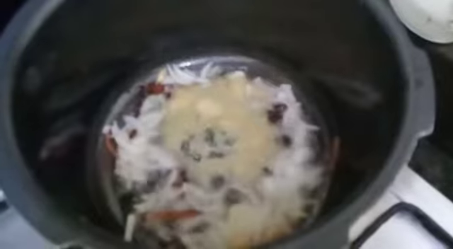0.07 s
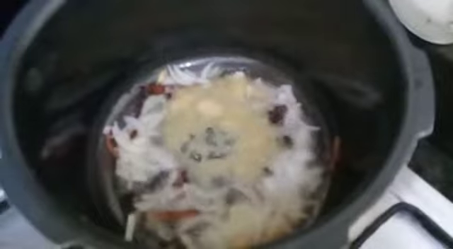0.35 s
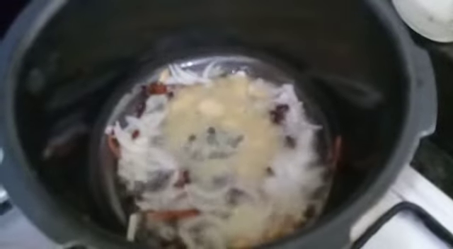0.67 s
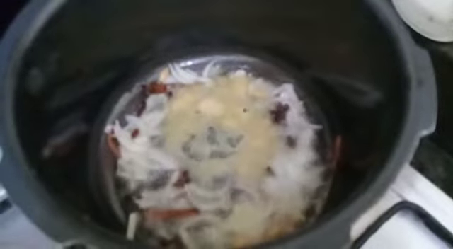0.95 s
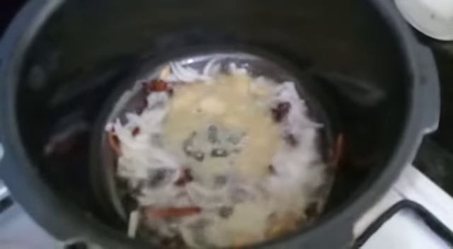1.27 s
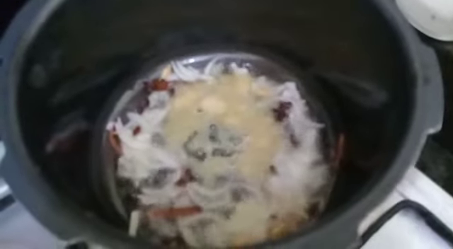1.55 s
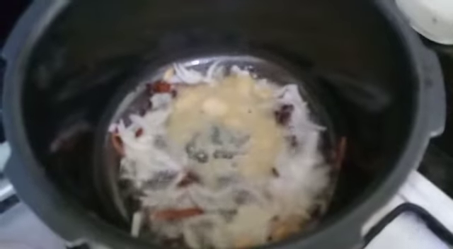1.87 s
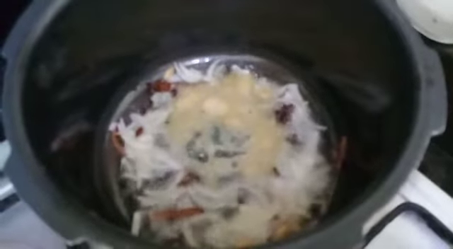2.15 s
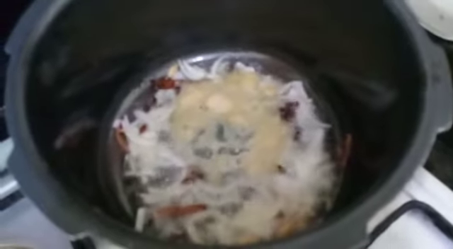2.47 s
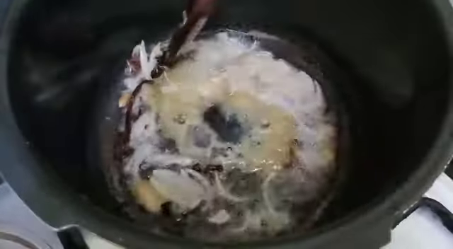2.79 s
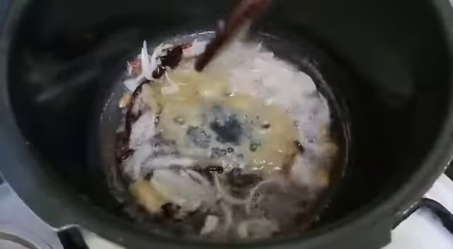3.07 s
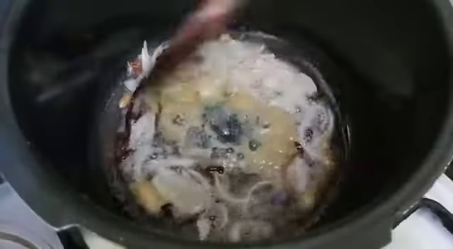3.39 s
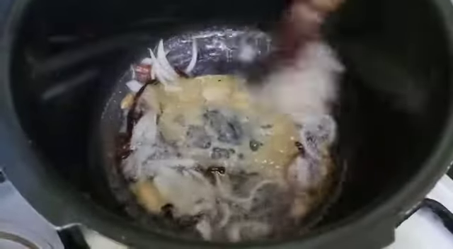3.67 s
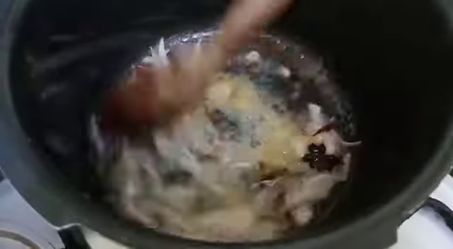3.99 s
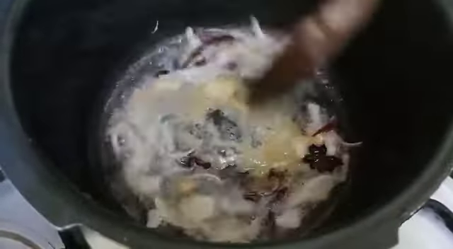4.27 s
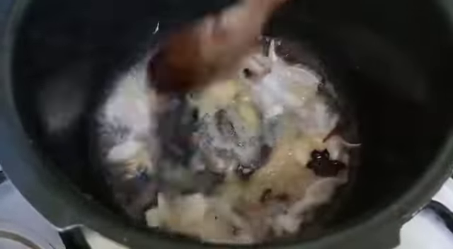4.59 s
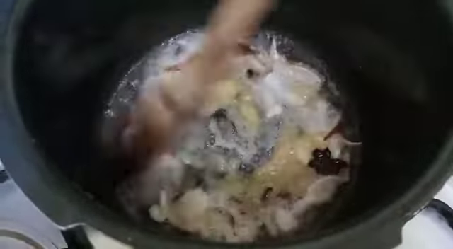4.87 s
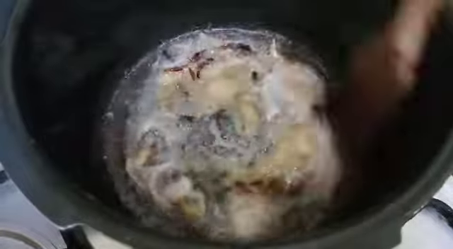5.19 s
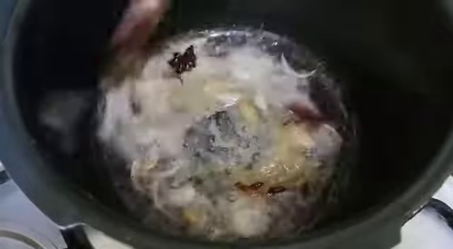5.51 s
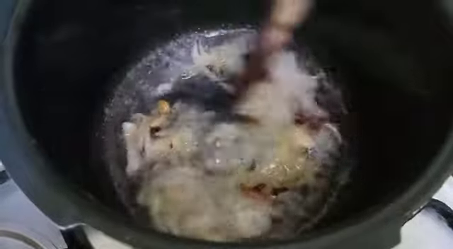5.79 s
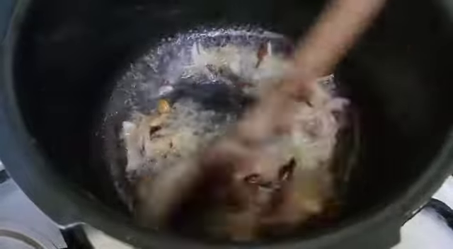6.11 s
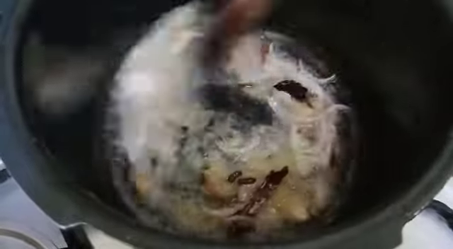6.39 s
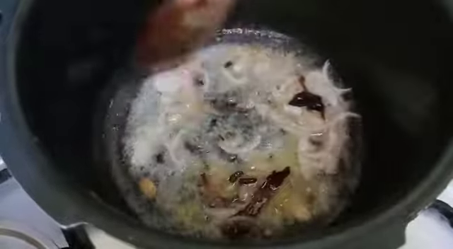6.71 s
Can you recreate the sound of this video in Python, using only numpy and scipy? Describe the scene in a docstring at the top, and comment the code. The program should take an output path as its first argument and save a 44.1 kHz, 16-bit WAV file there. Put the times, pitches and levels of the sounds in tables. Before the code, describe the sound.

Onions and spices crackle in a deep pot; after a brief fade to silence, a wooden spatula stirs with knocks and scrapes.

```python
"""A steady sizzle: onions, paste and spices fry in hot oil at the bottom of a deep pressure cooker.
Countless steam bubbles burst and make the air in the pot ring, while the oil spits and snaps.
A piece of metal clinks nearby, over dull rumbles and a faint kitchen hum. The sound fades out and
back in; then a wooden spatula stirs, scraping, squeaking and knocking on the metal."""
import sys
import numpy as np
from scipy import signal
from scipy.fft import rfft, irfft
from scipy.io import wavfile
from scipy.ndimage import uniform_filter1d

SR = 44100
rng = np.random.default_rng(int(sys.argv[2]) if len(sys.argv) > 2 else 0)


def to_wav(sig):
    """Store sig (one row per channel, or 1-D mono) as 16-bit WAV at the path in sys.argv[1].

    Samples outside -1..1 are clipped; the rate is SR.
    """
    pcm = np.clip(np.atleast_2d(sig), -1, 1) * 32767
    pcm = np.round(pcm).astype(np.int16)
    wavfile.write(sys.argv[1], SR, pcm.T)  # frames by channels


N = 302068
T = np.arange(N) / SR

# Dull rumbles under the frying. Each row: start in seconds, length in seconds, level in dB.
RUMBLE_EVENTS = [(0.004, 0.24, -52.5), (0.337, 0.16, -55), (0.718, 0.089, -52.5), (0.828, 0.36, -58),
                 (1.165, 0.35, -55), (1.687, 0.043, -67), (1.924, 0.043, -64), (2.248, 0.069, -56),
                 (3.257, 0.061, -60), (3.72, 0.11, -53.5), (3.984, 0.16, -62), (4.27, 0.067, -52.5),
                 (4.502, 0.052, -64.5), (5.24, .12, -70), (5.521, 0.046, -54), (5.684, 0.16, -54.5),
                 (6.392, 0.11, -62)]
# The tone of those rumbles. Each row: frequency in Hz, level in dB.
RUMBLE_SPECTRUM = [(30, -25), (70, -20.5), (110, -14.5), (145, 5), (175, 5), (230, -20), (400, -68)]
# A piece of metal lands and rattles. Each row: start in seconds, level in dB.
CLINK_EVENTS = [(.592, -26.5), (.782, -27), (0.798, -29), (0.816, -29), (.837, -29), (.862, -30),
                (0.876, -30.5), (0.897, -29.5), (.939, -34), (.975, -36), (1.02, -35)]
# Its modes, the tones it rings with. Each row: pitch in Hz, level in dB, seconds to fade by 60 dB.
METAL_MODES = [(762, -4, .06), (867, -1, 0.055), (990, -5, .05), (2000, -11, 0.083), (2304, -4, 0.22),
               (2420, -2.5, .18), (2475, 0, .18), (2600, -.5, 0.16), (2690, -2, .2), (2880, -4, .07),
               (3010, -0.5, .07), (3270, -1.5, 0.054), (4170, -9, .05), (4500, -8, .04)]
# The pot's modes under wood. Each row: pitch in Hz, level in dB, seconds to fade by 60 dB.
POT_MODES = [(236, -3.5, 0.073), (372, -6, 0.14), (508, -1.5, 0.052), (701, -7.5, 0.052), (840, -11, 0.047),
             (1088, -7, 0.047), (1141.5, -1.5, 0.098), (1238, -2, 0.054), (1398, -3.5, 0.08),
             (1813, -5.5, 0.071), (1974, -2, 0.066), (2130, 6.5, 0.009), (2530, -7, 0.05)]
# Wood squeaks on oily metal. Each row: start and length in seconds, level in dB,
# first and last pitch in Hz.
SPATULA_SQUEAKS = [(3.58, .028, -33, 1820, 1800), (3.614, 0.021, -32, 1820, 1810),
                   (3.671, 0.032, -32, 2120, 2040), (4.043, 0.032, -28, 3780, 3700),
                   (4.305, 0.052, -37, 1975, 1985), (5.036, 0.024, -29.5, 1790, 1750),
                   (6.12, 0.125, -29.5, 1790, 1810), (6.39, .08, -33, 1805, 1810),
                   (6.672, 0.02, -38, 1800, 1860), (6.725, 0.033, -36, 1820, 1760)]
# Scrapes along the bottom. Each row: start and length in seconds, level in dB,
# favoured pitch in Hz, drop away from that pitch in dB per octave.
SPATULA_STROKES = [(3.615, 0.33, -37, 560, 3.5), (3.917, 0.11, -35.5, 1250, 4.5),
                   (4.07, 0.077, -37.5, 500, 3), (4.235, 0.067, -36, 520, 20), (4.275, 0.11, -33, 790, 0),
                   (5.027, 0.093, -35, 1850, 12), (5.256, 0.075, -42, 334, 13),
                   (5.328, 0.3, -39.5, 2400, 20), (5.672, 0.19, -38, 580, 18), (5.996, 0.135, -39, 477, 6),
                   (6.03, 0.2, -36, 1240, 42), (6.1, 0.1, -32, 2020, 22), (6.237, 0.27, -34.5, 1930, 26),
                   (6.405, .1, -34, 700, 7), (6.789, 0.13, -33, 450, 3)]
# Knocks and rebounds. Each row: start in seconds, level of the first 10 ms in dB,
# favoured pitch in Hz, drop away from that pitch in dB per octave.
SPATULA_KNOCKS = [(3.636, -28, 694, 8), (3.698, -18, 1170, 20), (3.7061, -20.5, 1170, 26),
                  (3.718, -24, 1300, 18), (3.728, -27, 1130, 24), (3.757, -30, 1450, 17),
                  (3.829, -30, 2300, 6), (3.922, -32, 1250, 18), (4.07, -25, 850, 10),
                  (4.081, -28, 1130, 28), (4.095, -31, 600, 14), (4.269, -22.5, 1350, 18),
                  (4.281, -27, 1300, 16), (4.296, -26, 1200, 11), (4.302, -25, 1250, 10),
                  (4.367, -32, 1200, 8), (4.555, -34, 1200, 11), (5.086, -26, 1350, 14),
                  (5.242, -23.5, 1070, 16), (5.25, -23, 1360, 17), (5.282, -31, 350, 21),
                  (5.325, -26.5, 410, 7), (5.336, -30, 350, 10), (5.415, -30, 1190, 14),
                  (5.654, -16.5, 1030, 6.5), (5.668, -31, 540, 14), (5.682, -27, 500, 7),
                  (5.73, -28, 1200, 16), (5.759, -31, 1200, 7), (6.005, -22.5, 1350, 8),
                  (6.014, -24, 1370, 6), (6.028, -35.5, 335, 31), (6.052, -30, 760, 24),
                  (6.385, -23, 1200, 50), (6.427, -29.5, 480, 11), (6.531, -26, 1230, 37),
                  (6.798, -27, 550, 7), (6.819, -32, 380, 18), (6.837, -24, 432, 2)]
# Spits of steam. Each row: start in seconds, level in dB, decay in seconds, centre and width in Hz.
STEAM_SPITS = [(0.576, -18, 0.02, 5400, 2800), (0.785, -17.5, 0.015, 3400, 2580),
               (.852, -22, 0.0091, 4500, 498), (.936, -18, .005, 5900, 1190),
               (1.281, -18, 0.02, 6000, 1820), (1.495, -18, 0.022, 6000, 2960),
               (1.729, -17, 0.011, 5830, 2970), (1.765, -17, 0.015, 6040, 3020),
               (1.93, -21, 0.012, 5560, 3000), (2.085, -22, 0.021, 5700, 3020),
               (3.826, -25, 0.02, 2300, 900), (4.822, -25, 0.068, 3540, 2130),
               (5.572, -19, .007, 4900, 1400)]
# Loud snaps of oil. Each row: start in seconds, strength in dB, fizz compared with crackle in dB.
OIL_SNAPS = [(.1993, -14, 0), (.448, -9, 0), (0.718, -1, -24), (.7631, -2, -14), (0.837, 1, -22),
             (0.9365, -5, -16), (1.045, -10, -19), (1.077, -16, -6), (1.1324, -7, -8), (1.2915, -9, -8),
             (1.6814, -5, -15), (2.041, -13, -8), (2.1701, -8, -8), (2.2052, 1.5, -10), (3.252, -4, 8),
             (3.5646, -1, -22), (3.922, -3, -11), (4.16, -1, 2), (4.465, -13, -3), (5.5525, -3, 3),
             (5.8014, -5, -5), (6.104, 1, 0), (6.6815, -7, -10)]
# Brief dips in the sizzle. Each row: time in seconds, depth in dB, fall and recovery in seconds.
SIZZLE_DIPS = [(.555, 3.5, 0.013, 0.0087), (1.065, 1, 0.0065, .04), (1.185, 0, 0.011, 0.01),
               (1.335, 3, 0.043, 0.011), (1.478, 2.5, 0.0032, 0.053), (2.214, 7, 0.0014, 0.024),
               (3.01, 8.5, 0.0077, 0.01), (3.256, 5.5, 0.0046, 0.031), (3.703, 4, 0.013, 0.027),
               (5.665, 6.5, 0.024, 0.019)]
# The spatula turns wet food onto hot metal and the sizzle flares.
# Each row: middle and half length in seconds, crackle boost in dB, fizz boost in dB.
FOOD_SWEEPS = [(2.9, 0.23, 2, 8), (3.198, 0.23, 2, 4), (3.628, 0.29, 0.5, 4), (4.095, 0.3, 2, 3),
               (4.417, 0.22, 0, 3), (4.947, 0.2, 1.5, 2), (5.2, 0.29, 0.2, 3), (5.813, 0.06, 0.5, 3.5),
               (6.09, 0.25, -1, 4), (6.267, 0.16, 3, 0.5)]
# Tones of the air in the pot, the strongest first. Each row: pitch in Hz, width in Hz, level in dB.
AIR_MODES = [(1249, 55, 10.5), (404, 21, -9.5), (516.5, 12, -3.5), (546, 22, -3.5), (623, 24, -8.5),
             (743, 51, -5), (1011, 25, -7), (1070, 25, -4.5), (1340, 100, -7.5), (1493, 54, -5.5),
             (1876, 52, -2), (1967, 46, 4.5), (2340, 200, -5.5), (2520, 30, 1)]
# The strongest one sinks while the spatula is down in the food. Each row: time in seconds, pitch in Hz.
AIR_PITCH_PATH = [(3.1, 1237), (3.6, 1246), (3.72, 1176), (3.83, 1276), (4.59, 1180), (4.66, 1210),
                  (5.45, 1196), (5.55, 1264), (5.94, 1200), (6.11, 1274), (6.22, 1180), (6.8, 1248)]
# Higher tones between the pot walls. Each row: pitch and width in Hz, dB left alone, dB when stirred.
WALL_MODES = [(2820, 32, -5, -11), (2850, 23, -8.5, -11.5), (3220, 39, 3, -7.5), (3680, 49, -3, -7.5),
              (3766, 55, -0.5, -1.5), (4000, 70, -0.5, 0), (4316, 100, 0, -2.5), (4400, 90, -5.5, -5),
              (4600, 53, 4, 4.5), (4780, 85, -1.5, -11), (5020, 90, 3, 3.5), (5380, 110, -1, -4),
              (5555, 110, 5, 4.5), (5874, 130, 5, 5), (6190, 120, 1.5, 2.5), (6250, 110, -1, 2),
              (6620, 92, 0, 0), (7200, 90, -5, -19), (7580, 170, 0.5, 2.5)]
# The crackle and the finer fizz of bursting bubbles. Each row: frequency in Hz, level in dB.
CRACKLE_SPECTRUM = [(190, -37), (315, -16), (390, -13.5), (600, -10.5), (900, -10), (1600, -3),
                    (3000, -3.5), (4100, -2.5), (5050, -3.5), (5650, -1.5), (6400, -4.5), (7000, -2),
                    (7700, -7), (8600, -12.5), (9300, -33)]
FIZZ_SPECTRUM = [(7000, -63.5), (9400, -28.5), (9900, -5), (10600, -6.5), (11300, -10), (12100, 3),
                 (13000, 7.5), (14500, 11.5), (15400, 9.5), (16000, 4)]
# How much left and right differ. Each row: frequency in Hz, level in dB.
STEREO_SPECTRUM = [(100, -9.5), (210, -14), (300, -11.5), (520, -27), (800, -29.5), (1200, -57.5),
                   (5000, -63), (15000, -48.5)]

CRACKLE_DB, FIZZ_DB, BUBBLING_DB = -23.5, -26.5, -29  # starting levels, food left alone
CRACKLE_DRYING, FIZZ_DRYING, BUBBLING_DRYING = 0.77, 1.4, 0.93  # dB lost per second as the food dries
STIRRED_CRACKLE_DB, STIRRED_FIZZ_DB, STIRRED_BUBBLING_DB = -25, -29.5, -33
BUBBLING_RISE = 0.43  # dB gained per second as stirring wets the hot metal
FLURRY_DB, STIRRED_FLURRY_DB = 1.25, 0.37  # how much flurries of bubbles sway the level
PRESS_DB_PER_S = 2200  # extra damping by the blade, for a knock at 0 dB
HUM_HZ, HUM_DB = 287.7, -49.5
FADE_OUT_S, FADE_OUT_LENGTH_S, SILENT_S = 2.247, 0.48, 2.637
FADE_IN_S, FADE_IN_LENGTH_S, FADE_IN_POWER = 2.746, 0.5, 1.65
STIRRED = T > FADE_IN_S


def amp(db):
    """Turn decibels into a gain."""
    return 10 ** (np.asarray(db) / 20)


def unit(x):
    """Scale a sound to an average (rms) level of 1."""
    return x / np.sqrt(np.mean(x ** 2) + 1e-20)


def add(mix, start, sound):
    """Mix a sound in at a start time in seconds."""
    part = mix[max(round(start * SR), 0):][:len(sound)]
    part += sound[:len(part)]


def wander(rate_hz, slowest_hz=0):
    """A smooth random wobble of size 1, mostly between the two rates."""
    f = np.fft.rfftfreq(N, 1 / SR)
    shape = f ** 2 / (f ** 2 + slowest_hz ** 2 + 1e-9) / (1 + (f / rate_hz) ** 2)
    return unit(irfft(rfft(rng.standard_normal(N)) * shape, N))


def colour(x, spectrum, size=2048):
    """Shape a sound with a spectrum table; clicks keep their sharp start."""
    hz, db = np.transpose(spectrum)
    bins_hz = abs(np.fft.fftfreq(size, 1 / SR))
    log_gain = np.log(amp(np.interp(np.log(bins_hz + 1), np.log(hz), db)))
    taps = np.fft.ifft(np.exp(np.conj(signal.hilbert(log_gain)))).real
    return signal.oaconvolve(x, taps)[:len(x)]


def resonate(x, hz, width):
    """Make a sound ring at a pitch that may move; a narrow width rings longer."""
    turn = np.exp(2j * np.pi * np.cumsum(hz * np.ones(len(x))) / SR)
    feedback = np.exp(-np.pi * width / SR)
    return 2 * (turn * signal.lfilter([1 - feedback], [1, -feedback], x / turn)).real


def band(x, lo_hz, hi_hz, order=2):
    """Keep what lies between two frequencies."""
    sections = signal.butter(order, [lo_hz, min(hi_hz, SR / 2 - 100)], "band", fs=SR, output="sos")
    return signal.sosfilt(sections, x)


def clicks(n, per_s, spread_db):
    """Random clicks; a positive spread makes a few louder, a negative one makes a few softer."""
    chance, sign, size = rng.random((3, n))
    size_db = spread_db * np.minimum(-np.log(1 - size), 4.5)
    return (chance < per_s / SR) * np.sign(sign - .5) * amp(size_db)


def hum():
    """A faint, slightly wavering kitchen hum."""
    turns = np.cumsum(HUM_HZ * (1 + 0.0075 * wander(rate_hz=10.3))) / SR
    return amp(HUM_DB) * unit(np.sin(2 * np.pi * turns) * amp(2.3 * wander(rate_hz=18)))


def rumbles():
    """Short swells of low noise under the frying."""
    out = np.zeros(N)
    low = colour(rng.standard_normal(N), RUMBLE_SPECTRUM, size=4096)
    for start, length, db in RUMBLE_EVENTS:
        n = int(length * SR)
        add(out, start, amp(db) * unit(low[int(start * SR):][:n] * signal.windows.tukey(n, .6)))
    return out


def clinks():
    """A piece of metal rattles; each touch is a quick chatter that rings its modes in a new mix."""
    out, t = np.zeros(N), T[:SR // 3]
    for start, db in CLINK_EVENTS:
        ring = 0
        for hz, mode_db, fade_s in METAL_MODES:
            detune, phase = rng.standard_normal(2)
            tone = np.sin(2 * np.pi * (hz * (1 + 0.0092 * detune) * t + phase))
            ring += amp(mode_db - 60 * t / fade_s) * tone
        chatter = clicks(SR // 30, per_s=1300, spread_db=-1.5) * np.exp(-T[:SR // 30] / 0.0063)
        chatter /= np.linalg.norm(chatter) + 1e-9
        add(out, start, amp(db) * signal.fftconvolve(ring, chatter))
    return out


def pot_ring(centre_hz, fall_db, looseness):
    """One blow of wood on the pot: the spot and its softness favour some modes and detune them a bit."""
    t = T[:SR // 8]
    ring = np.zeros(len(t))
    for hz, db, fade_s in POT_MODES:
        detune, phase = rng.standard_normal(2)
        height = amp(db - fall_db * abs(np.log2(hz / centre_hz)))
        shift_hz = looseness * detune * 3.57 / fade_s  # short-lived modes stray further
        swell = (1 - np.exp(-t * hz / 0.34)) ** 2  # builds up over the first cycle or two
        tone = np.sin(2 * np.pi * ((hz + shift_hz) * t + phase))
        ring += height * swell * amp(-60 * t / fade_s) * tone
    return ring


def squeaks():
    """Wood sticks and slips unevenly: a short tone broken up by scraping grains."""
    out = np.zeros(N)
    jitter = .011 * wander(rate_hz=250)
    grip = amp(2.8 * wander(rate_hz=180))
    for start, length, db, start_hz, end_hz in SPATULA_SQUEAKS:
        n, at = int(length * SR), int(start * SR)
        hz = np.linspace(start_hz, end_hz, n) * (1 + jitter[at:at + n])
        tone = np.sin(2 * np.pi * np.cumsum(hz) / SR) * grip[at:at + n]
        grains = resonate(clicks(SR // 4, per_s=370, spread_db=2.0)[:n], hz, width=110)
        squeak = unit(tone) + .35 * unit(grains)
        add(out, start, amp(db) * unit(squeak * signal.windows.tukey(n, .6)))
    return out


def strokes(spots=5):
    """The spatula scrapes in tiny slips, ringing several spots on the bottom of the pot."""
    out = np.zeros(N)
    for start, length, db, centre_hz, fall_db in SPATULA_STROKES:
        n = int(length * SR)
        rub = 0
        for _ in range(spots):
            slips = clicks(SR // 2, per_s=220, spread_db=3.0)[:n] * signal.windows.tukey(n, .6)
            rub += signal.fftconvolve(slips, pot_ring(centre_hz, fall_db, looseness=0.84))
        add(out, start, amp(db) * rub / np.std(rub[:n]))
    return out


def knocks():
    """The spatula strikes the pot; the harder the blow, the more the blade damps the ringing."""
    out = np.zeros(N)
    for start, db, centre_hz, fall_db in SPATULA_KNOCKS:
        ring = pot_ring(centre_hz, fall_db, looseness=0.27)
        ring *= amp(-PRESS_DB_PER_S * amp(db) * T[:len(ring)])
        add(out, start, amp(db) * ring / np.std(ring[:SR // 100]))
    return out


def spits(rise_s=.003):
    """Wet bits hit the oil and let out sudden jets of steam that die away."""
    out, t = np.zeros(N), T[:SR // 2]
    for start, db, decay, hz, width in STEAM_SPITS:
        jet = band(rng.standard_normal(len(t)), max(hz - width / 2, 200), hz + width / 2, order=4)
        add(out, start, amp(db) * unit(jet) * (1 - np.exp(-t / rise_s)) * np.exp(-t / decay))
    return out


def snaps():
    """Single large bubbles burst with a sharp tick, some with a spray of fizz."""
    out, t = np.zeros(N), T[:512]
    for start, db, fizz_db in OIL_SNAPS:
        burst = rng.standard_normal(len(t)) * np.exp(-t / 0.00013)
        tick = band(colour(burst, CRACKLE_SPECTRUM), 2200, 9000)
        snap = tick + amp(fizz_db) * colour(burst, FIZZ_SPECTRUM)
        add(out, start, amp(db - 5.0) * snap / abs(snap).max())
    return out


def blips(per_s, softest_db, cycles):
    """Medium bubbles each ring briefly at a pitch of their own."""
    out, t = np.zeros(N), T[:512]
    for when, pitch, size in rng.random((int(per_s * N / SR), 3)):
        hz = 3400 * 2 ** pitch  # anywhere within an octave
        ring = np.sin(2 * np.pi * hz * t) * np.exp(-t * hz / cycles)
        add(out, when * N / SR, amp(softest_db + 6.2 * size) * ring)
    return out


def dips():
    """A gain that makes the sizzle dip briefly and recover."""
    return amp(-sum(db * np.exp(-abs(T - when) / np.where(T < when, fall, recovery))
                    for when, db, fall, recovery in SIZZLE_DIPS))


def clusters(x, depth_db):
    """Each cluster of bubbles favours its own pitches for a few milliseconds."""
    slices = signal.stft(x, nperseg=256)[2]
    patches = uniform_filter1d(rng.standard_normal(slices.shape), size=6, axis=0)  # smooth over pitch
    patches = unit(uniform_filter1d(patches, size=4, axis=1))  # and over time
    return signal.istft(slices * amp(depth_db * patches), nperseg=256)[1][:len(x)]


def wall_rings(x, bend):
    """Sound rings between the pot walls; moving the food changes which tones stand out."""
    return x + sum(amp(np.where(STIRRED, stirred_db, alone_db)) * resonate(x, hz * bend ** 0.027, width)
                   for hz, width, alone_db, stirred_db in WALL_MODES)


def air_rings(x, bend):
    """The air in the pot rings; its strongest tone follows the spatula fully, the others a little."""
    air = sum(amp(db) * resonate(x, hz * bend ** (1 if k == 0 else .15), width)
              for k, (hz, width, db) in enumerate(AIR_MODES))
    return unit(band(air, 360, 4000, order=3))


def frying_levels():
    """Left alone, the food dries and gets quieter; each sweep of the spatula makes it flare."""
    crackle_db = np.where(STIRRED, STIRRED_CRACKLE_DB, CRACKLE_DB - CRACKLE_DRYING * T)
    fizz_db = np.where(STIRRED, STIRRED_FIZZ_DB, FIZZ_DB - FIZZ_DRYING * T)
    wetted_db = STIRRED_BUBBLING_DB + BUBBLING_RISE * (T - FADE_IN_S)
    bubbling_db = np.where(STIRRED, wetted_db, BUBBLING_DB - BUBBLING_DRYING * T)
    for middle, half_length, crackle_boost_db, fizz_boost_db in FOOD_SWEEPS:
        flare = np.exp(-((T - middle) / half_length) ** 2)
        crackle_db += crackle_boost_db * flare
        fizz_db += fizz_boost_db * flare
    return crackle_db, fizz_db, bubbling_db


def pitch_bend(waver=0.016):
    """The moving spatula makes the pot's air tone sink and waver; 1 means no change."""
    rest_hz = AIR_MODES[0][0]
    hz = np.where(STIRRED, np.interp(T, *np.transpose(AIR_PITCH_PATH)), rest_hz)
    moving = np.interp(T, [3.4, 3.7], [0, 1])
    return hz / rest_hz * (1 + waver * moving * wander(rate_hz=11))


def sizzle():
    """Steam bubbles burst in flurries: a crackle, a finer fizz, and hollow bubbling in the pot."""
    crackle_db, fizz_db, bubbling_db = frying_levels()
    bend = pitch_bend()
    sway_db = np.where(STIRRED, STIRRED_FLURRY_DB, FLURRY_DB) * wander(rate_hz=11, slowest_hz=5)
    flurry = amp(sway_db + 0.62 * wander(rate_hz=730))
    bursts = unit(clicks(N, per_s=7000, spread_db=1.0)) * flurry
    pops = wall_rings(clusters(bursts, depth_db=1.44), bend)
    crackle = unit(colour(pops, CRACKLE_SPECTRUM)) * amp(crackle_db)
    fine_bursts = unit(clicks(N, per_s=2700, spread_db=2.5)) * flurry
    spray = clusters(bursts + 1.1 * fine_bursts, depth_db=2.5)
    fizz = unit(colour(spray, FIZZ_SPECTRUM)) * amp(fizz_db)
    puffs = bursts + 2.6 * unit(clicks(N, per_s=1500, spread_db=2.5))
    bubbling = air_rings(puffs, bend) * amp(bubbling_db + 2.36 * wander(rate_hz=20))
    return crackle + fizz + bubbling


def scene():
    """Mix it all. The pot gives off little bass; left and right differ slightly, mostly in the lows."""
    bubbles = sizzle() + blips(per_s=90, softest_db=-29.0, cycles=15.0)
    frying = bubbles * dips() + spits() + snaps()
    spatula = knocks() + strokes() + squeaks()
    mid = band(frying + spatula + clinks() + hum(), 230, 20000, order=6) + rumbles()
    t = T[:2048]
    echoes = rng.standard_normal(len(t)) * np.exp(-t / 0.033)  # nearby reflections, unequal on each side
    side = colour(signal.oaconvolve(mid, echoes / np.linalg.norm(echoes))[:N], STEREO_SPECTRUM)
    return np.array([mid + side, mid - side])


def record(dry):
    """Fade out, stay silent for a moment, fade gently back in, and cut the highest treble."""
    fade_out = np.clip(1 - (T - FADE_OUT_S) / FADE_OUT_LENGTH_S, 0, 1)
    fade_out *= np.clip((SILENT_S - T) / 0.02, 0, 1)  # a quick final drop to silence
    fade_in = np.clip((T - FADE_IN_S) / FADE_IN_LENGTH_S, 0, 1) ** FADE_IN_POWER
    low_pass = signal.firwin(511, cutoff=15750, window=("kaiser", 9), fs=SR)
    return signal.oaconvolve(dry * (fade_out + fade_in), low_pass[None], "same")


dry = scene()
out = record(dry)
to_wav(out)
```